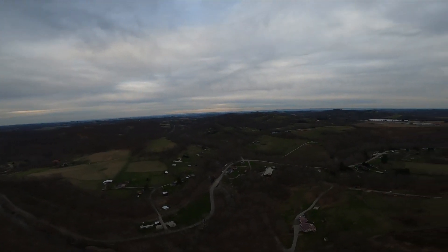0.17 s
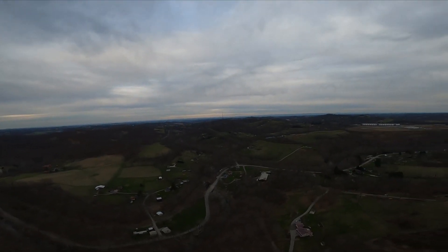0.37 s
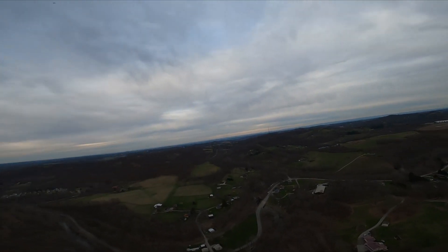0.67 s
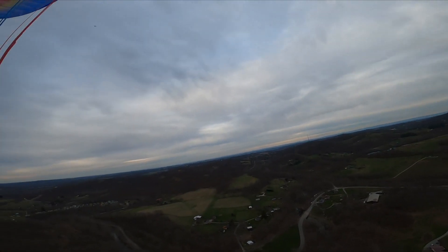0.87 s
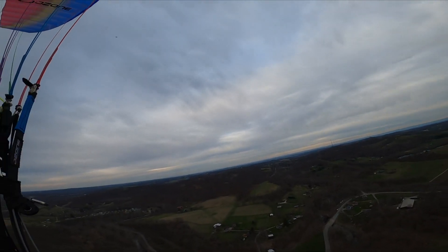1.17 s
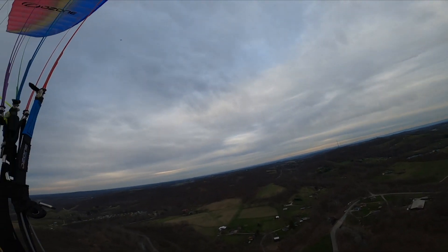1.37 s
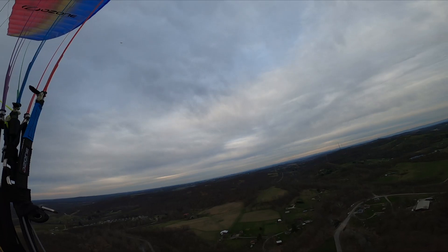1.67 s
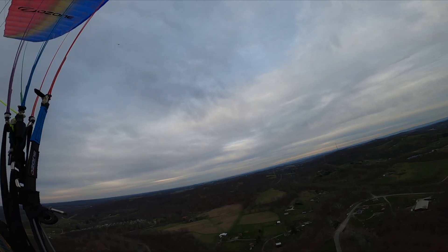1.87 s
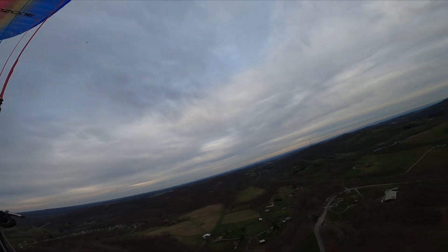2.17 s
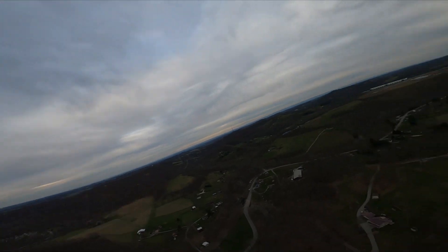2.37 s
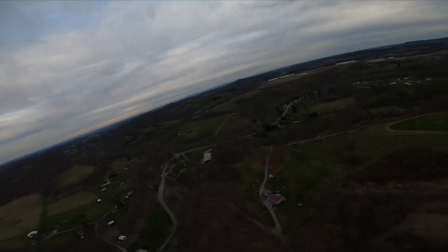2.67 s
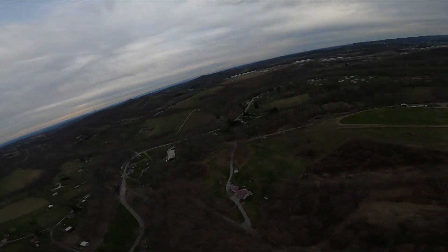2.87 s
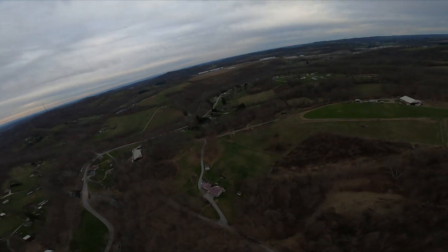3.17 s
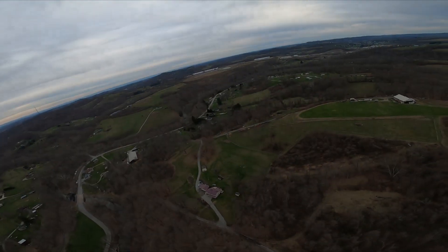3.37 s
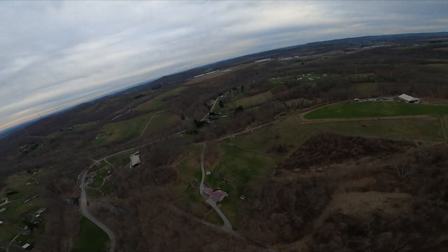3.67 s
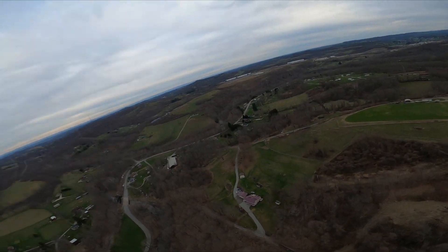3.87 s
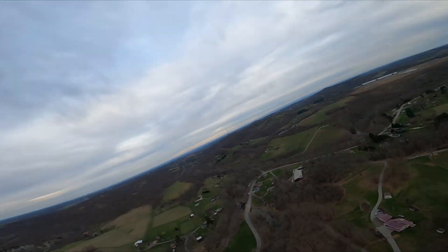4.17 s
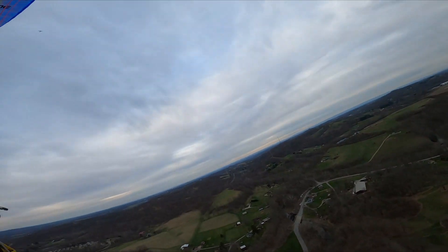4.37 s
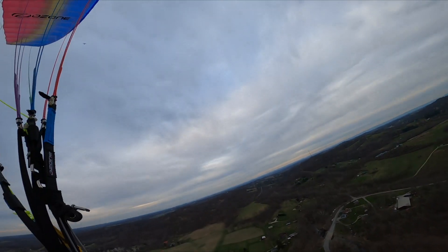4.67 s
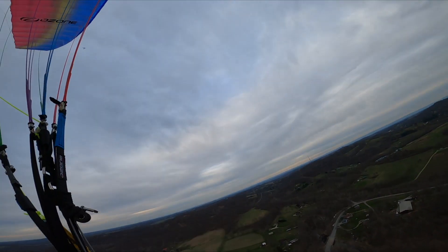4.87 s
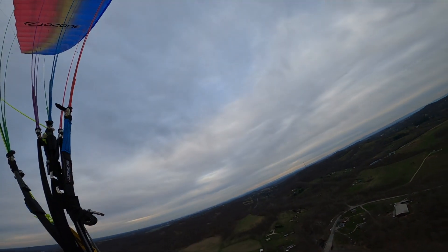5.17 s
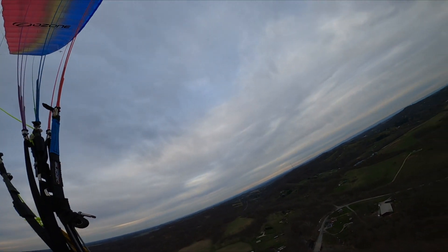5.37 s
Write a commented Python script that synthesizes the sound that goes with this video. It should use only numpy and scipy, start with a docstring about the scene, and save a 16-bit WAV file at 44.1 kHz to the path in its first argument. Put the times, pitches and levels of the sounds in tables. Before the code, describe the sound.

A steady paramotor flight with no start or stop: low buzzing engine, rapid propeller throb and broad rushing air, close and dense, without echo. The helmet microphone turns aside after about one second, opening the treble, faces ahead from about two and a half seconds, adding fan-like whine and stronger airstream hiss, then turns aside again after four seconds, when the drone softens slightly.

```python
"""A rough, beating drone runs throughout, together with air noise: a paramotor in steady flight, with the
microphone at the pilot's helmet. A two-stroke fires 94 times a second and turns a two-blade propeller through
a belt; the two rows of harmonics beat against each other over prop wash, which is noise chopped at the blade
rate. Twice the head turns aside, which uncovers the treble. While it faces ahead, the whine (sines locked to
the crank) and the airstream's hiss (filtered noise) are strongest."""
import sys
import numpy as np
from scipy import signal
from scipy.fft import rfft, irfft
from scipy.io import wavfile
from scipy.ndimage import uniform_filter1d

SR = 44100
rng = np.random.default_rng(int(sys.argv[2]) if len(sys.argv) > 2 else 0)


def put_to_file(sound):
    """Save the sound as 16-bit audio at rate SR, in the file named by the first command-line argument."""
    columns = np.atleast_2d(sound).T  # one column per channel
    safe = np.clip(columns, -1, 1)
    whole_steps = np.round(safe * 32767)
    wavfile.write(sys.argv[1], SR, whole_steps.astype(np.int16))


N = 243431
T = np.arange(N) / SR
HZ = np.maximum(np.arange(N // 2 + 1) * SR / N, 1)


def from_db(db):
    """Decibels to gain."""
    return 10 ** (np.asarray(db) / 20)


def rms_one(x):
    """Scale to rms 1."""
    return x / np.sqrt(np.mean(x ** 2) + 1e-20)


def in_time(rows):
    """Each column of a curve at every sample."""
    s, *columns = np.transpose(rows)
    return [np.interp(T, s, c) for c in columns]


def at_hz(rows):
    """Each dB column of a spectrum as a gain at every frequency."""
    hz, *columns = np.transpose(rows)
    return [from_db(np.interp(np.log(HZ), np.log(hz), c)) for c in columns]


def coloured(x, gain):
    """Filter by a gain per frequency."""
    return irfft(rfft(x) * gain, N)


def drift(rate_hz):
    """Slow chance with spread 1: noise through two equal low-pass poles, computed every 40 samples."""
    pole = np.exp(-80 * np.pi * rate_hz / SR)
    noise = rng.standard_normal(N // 40 + 2002)
    slow = signal.lfilter([1], [1, -2 * pole, pole * pole], noise)[2000:]  # drop the filter's start
    return np.interp(np.arange(N) / 40, np.arange(len(slow)), rms_one(slow))


def swells(rows):
    """Sum of smooth rises and dips in dB."""
    return sum(db * np.exp(-.5 * ((T - s) / width) ** 2) for s, width, db in rows)


def by_turn(turn):
    """Shares of the three head directions: ahead, half turned, aside."""
    return np.array([np.interp(turn, [0, .5, 1], corner) for corner in np.eye(3)])


HEAD_START = .48  # about half turned (0 ahead .. 1 aside)
# turns of the head that carries the microphone: (middle time [s], duration [s], new direction [0-1])
HEAD_TURNS = [(0.65, .55, 0.64), (0.965, 0.06, 1), (1.9, .8, .95), (2.385, 0.17, .4), (2.57, .2, .05),
              (4.27, .16, .4), (4.445, .15, .86), (4.7, .36, 1)]


def head_direction():
    """The head rests, and moves at an even pace to each new direction."""
    turn = np.full(N, HEAD_START)
    for middle, duration, direction in HEAD_TURNS:
        progress = np.clip((T - middle) / duration + .5, 0, 1)
        turn = turn + (direction - turn) * progress
    return turn


# gusts and lulls in the airflow: (time [s], width [s], level [dB])
GUSTS = [(0.0, 0.23, -2), (1.08, 0.12, 1.5), (2.45, 0.21, -3), (2.83, .15, -2), (3.75, 0.47, 2.5)]


def gusts():
    """Strength of the airflow in dB, 0 in calm air."""
    return swells(GUSTS)


# engine speed: (time [s], rate [firings per s])
ENGINE_SPEED = [(0, 94.42), (0.35, 94.54), (1.1, 93.8), (1.7, 93.61), (2.25, 94.19), (2.75, 93.82),
                (3.15, 94.21), (4.85, 93.74), (5.52, 93.88)]


def crank_turns():
    """Turns of the crank so far; a two-stroke fires once in each."""
    speed, = in_time(ENGINE_SPEED)
    return np.cumsum(speed) / SR


# bursts of turbulence within one blade passage:
# (place in the cycle [0-1], width [cycles], relative height ahead, half turned, aside)
BLADE_BURSTS = [(.86, .045, 1.5, .9, .6), (.52, .09, .3, 1.4, .6), (.62, .19, .3, .2, 1.0),
                (.1, .13, 1.1, .15, .1)]
EVENER_ASIDE = .7  # share of their unevenness that the bursts lose, heard directly with the head aside


def chopping(passages, turn, depth, uneven_db):
    """The air bursts as each blade cuts the wakes of pilot and frame, every burst with its own strength."""
    gain, shares = np.ones(N), by_turn(turn)
    uneven_db = uneven_db * (1 - EVENER_ASIDE * turn)
    for place, width, *heights in BLADE_BURSTS:
        count, within = np.divmod(passages - place + .5, 1)
        count = (count - count[0]).astype(int)
        chance = np.clip(rng.standard_normal(count[-1] + 1), -2, 2)
        strength = from_db(uneven_db * chance[count])
        shape = np.exp(-.5 * ((within - .5) / width) ** 2)
        gain += depth * (heights @ shares) * strength * shape
    quarter_second_power = uniform_filter1d(gain ** 2, size=SR // 4)
    return gain / np.sqrt(quarter_second_power)


# colour of the wash at the helmet, before trim and gusts:
# (frequency [Hz], density [dB per Hz] ahead, half turned, aside)
WASH_COLOUR = [(20, -60.5, -53, -50.5), (70, -50, -53, -44.5), (130, -49, -48.5, -46), (193, -47, -48, -45),
               (270, -44.5, -45.5, -45), (500, -52.5, -51.5, -50.5), (616, -55, -51, -51.5),
               (750, -55.5, -54.5, -53), (1404, -60, -58, -56.5), (2390, -73.5, -73.5, -65),
               (2950, -75, -73, -66.5), (3500, -79.5, -80, -71.5), (3950, -79.5, -76, -68),
               (4870, -90, -84, -79), (5880, -94.5, -85.5, -82), (7960, -99.6, -99.5, -90),
               (9600, -106, -103, -102), (12900, -109, -108, -106), (14500, -134, -134, -134)]
# eddies of every size are chopped in their own way: (band centre [Hz], chopping depth ahead, half turned,
# aside, burst unevenness facing ahead [dB], gain per dB of gust [dB])
EDDIES = [(249, .2, .2, .2, 1, 0), (920, 1.7, 1.2, .6, 3.2, 1.25), (2160, 1.1, 1.1, .65, 2.9, .9),
          (5600, .3, 1.5, .85, 3.4, .7), (12000, .8, 1.3, 1.1, 5.5, .8)]
WASH_TRIM_DB = -.5  # for every band above the deep rumble


def wash(passages, firings, turn, gust_db, grain_db=2.17, rasp=0.043):
    """Chopped air in overlapping bands, rasping slightly with the firings; facing ahead shades its treble."""
    centres, shares = np.array(EDDIES)[:, 0], by_turn(turn)
    air = np.zeros(N)
    for k, (corner, eddy) in enumerate(zip(np.eye(len(EDDIES)), EDDIES)):
        _, *depths, uneven_db, follows = eddy
        gain = chopping(passages, turn, depths @ shares, uneven_db) * from_db(follows * gust_db)
        if k > 0:  # the deep rumble stays smooth while the rush above it is grainy
            grain = rms_one(from_db(grain_db * drift(200)))
            gain = gain * grain * from_db(WASH_TRIM_DB) * (1 + rasp * np.cos(2 * np.pi * firings))
        band = np.sqrt(np.interp(np.log(HZ), np.log(centres), corner))
        noise = rng.standard_normal(N) * np.sqrt(SR / 2)  # power 1 per Hz
        air += coloured(gain * noise, band)
    air = coloured(air, HZ ** 2 / np.hypot(HZ ** 2, 22 ** 2))  # thin out below 22 Hz
    return sum(share * coloured(air, colour) for share, colour in zip(shares, at_hz(WASH_COLOUR)))


# colour of the hiss: (frequency [Hz], relative density [dB per Hz])
HISS_COLOUR = [(6000, -26.5), (8600, 0.5), (10200, -6), (11500, 1), (12500, -3), (13300, -14), (15000, -40)]
# hiss at the helmet: (time [s], level [dB])
HISS_LEVEL = [(0, -78), (.5, -75), (1.0, -63), (1.5, -74), (2.25, -67), (2.5, -78), (2.95, -68),
              (3.25, -64), (3.45, -62.5), (3.65, -59.5), (3.85, -59), (4.05, -60), (4.25, -61.5),
              (4.6, -71), (5.52, -71)]


def hiss(passages, turn):
    """Air over the helmet: a thin noise, chopped with the blades."""
    hiss_db, = in_time(HISS_LEVEL)
    colour, = at_hz(HISS_COLOUR)
    noise = rms_one(coloured(rng.standard_normal(N), colour))
    return from_db(hiss_db) * noise * chopping(passages, turn, depth=.8, uneven_db=6.5)


# colour of the sizzle: (frequency [Hz], relative density [dB per Hz])
SIZZLE_COLOUR = [(10000, -29), (12400, -1), (14500, 2), (15700, -6)]
# sizzle at the helmet, held near the peak of the strongest gust and flaring as it wanes:
# (time [s], level [dB], flutter [dB])
SIZZLE_LEVEL = [(2.9, -100, 0), (3.5, -72, 0), (3.72, -63.5, 2), (4.05, -63.5, 1), (4.18, -58, 8),
                (4.25, -57, 6), (4.31, -77, 5), (4.6, -99, 5)]
PUFF_PLACE, BLADES = .7, 2  # place of the puff in the blade cycle (0-1), blades of the propeller


def sizzle(passages, blade_mismatch=.3):
    """Higher air noise that starts smoother, then puffs with each blade, one blade harder than the other."""
    sizzle_db, flutter_db = in_time(SIZZLE_LEVEL)
    colour, = at_hz(SIZZLE_COLOUR)
    noise = rms_one(coloured(rng.standard_normal(N), colour))
    angle = 2 * np.pi * (passages - PUFF_PLACE)
    mismatch = 1 - blade_mismatch * np.cos(angle / BLADES)
    puffs = rms_one(from_db(flutter_db * np.cos(angle)) * mismatch)
    return from_db(sizzle_db) * noise * puffs


# partials of the whine: (multiple of the crank rate)
WHINE_MULTIPLES = [15, 29, 30, 31]
# their strength in the same order: (relative level [dB])
WHINE_PARTIALS_DB = [1, -12, 0, -13]
# whine at the helmet: (time [s], level [dB])
WHINE_LEVEL = [(0, -57), (.4, -49), (.6, -52), (.85, -57), (2.9, -59), (3.1, -50.5), (3.45, -46),
               (4.08, -45.5), (4.2, -53), (4.4, -56), (5.52, -58)]
WHINE_JITTER = .003  # crank cycles, rms


def whine(firings):
    """A thin whine locked to the crank, as from the vanes of a cooling fan; it is slightly unsteady."""
    whine_db, = in_time(WHINE_LEVEL)
    angle = 2 * np.pi * (firings + WHINE_JITTER * drift(22))
    partials = sum(from_db(level_db + drift(24)) * np.sin(multiple * angle)
                   for multiple, level_db in zip(WHINE_MULTIPLES, WHINE_PARTIALS_DB))
    return np.sqrt(2) * from_db(whine_db) * partials


def pulse_phases(orders_db, size=1024):
    """Phases for a pressure pulse, steep at the front and ringing after (minimum phase)."""
    multiples = np.arange(1, len(orders_db) + 1)
    log_gain = np.log(from_db(np.interp(np.arange(size // 2 + 1), multiples, orders_db)))
    cepstrum = irfft(log_gain)
    one_sided = np.r_[cepstrum[0], 2 * cepstrum[1:size // 2]]
    return rfft(one_sided, size).imag[multiples]


WAVER_DB = .9  # wavering of each harmonic, rms
STEADY_BELOW_MULTIPLE = 4  # the long waves of the deepest harmonics waver less


def rotor(cycles, orders, turn, jitter, smear, rough_db, harmonic_swells=(), deep_lag=0):
    """Uneven pulses smeared on their way; head direction colours them and each harmonic wavers."""
    levels_db, shares = np.array(orders)[:, 1:], by_turn(turn)
    phases = pulse_phases(levels_db.mean(axis=1))
    angle = 2 * np.pi * (cycles + jitter * drift(25))
    out = np.zeros(N)
    for k, (level_db, phase) in enumerate(zip(levels_db, phases), 1):
        waver_db = min(k / STEADY_BELOW_MULTIPLE, 1) * WAVER_DB * drift(1.2)
        swell_db = waver_db + swells(row[:-1] for row in harmonic_swells if row[-1] == k)
        shift = smear * k ** 2 - deep_lag * min(1, (2 / k) ** 2)  # cycles
        gain = from_db(level_db @ shares + swell_db)
        out += gain * np.cos(k * angle + phase + 2 * np.pi * shift)
    return np.sqrt(2) * out * from_db(rough_db * drift(43))


# harmonics of the firing rate, before trim and gusts: (multiple, level [dB] ahead, half turned, aside)
EXHAUST_ORDERS = [(1, -21.4, -22.0, -22.9), (2, -30.5, -35.4, -35.0), (3, -24.8, -26.7, -30.3),
                  (4, -32.4, -31.6, -31.9), (5, -35.4, -34.2, -36.1), (6, -37.6, -38.4, -40.5),
                  (7, -39.2, -42.2, -44.7), (8, -45.5, -47.5, -45.6), (9, -42.5, -44.6, -43.9),
                  (10, -48.0, -48.7, -49.7)]
# single exhaust harmonics swell or fade for a while: (time [s], width [s], level [dB], multiple)
EXHAUST_SWELLS = [(.75, .25, 1.5, 1), (1.4, .15, -3, 1), (5.25, .2, 2.5, 1), (3.7, .4, 1.5, 2),
                  (.2, .3, -2, 3), (1.6, .3, -3, 3), (2.6, .2, 3, 3), (4.0, .35, 1.5, 3)]
EXHAUST_TRIM_DB, EXHAUST_FOLLOWS = 0.96, 0.57  # dB in calm air, dB gained per dB of gust
EXHAUST_JITTER, EXHAUST_SMEAR = .003, .04  # cycles rms, cycles per squared multiple (dispersion)


def exhaust(firings, turn, gust_db):
    """The two-stroke's pulse at every firing."""
    pulses = rotor(firings, EXHAUST_ORDERS, turn, EXHAUST_JITTER, EXHAUST_SMEAR,
                   rough_db=0.97, harmonic_swells=EXHAUST_SWELLS)
    return from_db(EXHAUST_TRIM_DB + EXHAUST_FOLLOWS * gust_db) * pulses


# harmonics of the blade-passing rate, before trim and gusts:
# (multiple, level [dB] ahead, half turned, aside)
BLADE_ORDERS = [(1, -24.0, -22.1, -20.5), (2, -27.4, -30.7, -31.5), (3, -31.0, -31.7, -33.0),
                (4, -28.0, -33.0, -34.5), (5, -25.8, -27.4, -27.7), (6, -26.7, -28.1, -27.8),
                (7, -28.8, -30.2, -32.5), (8, -34.9, -37.9, -38.5), (9, -33.5, -37.3, -38.9),
                (10, -43.0, -32.0, -30.5), (11, -31.5, -37.0, -37.0), (12, -48.4, -38.9, -38.9),
                (13, -41.6, -41.6, -41.5), (14, -46.5, -45.4, -41.6), (15, -47.0, -48.5, -47.9),
                (16, -41.3, -44.8, -47.0), (17, -43.8, -44.9, -48.2), (18, -52.9, -44.7, -46.2),
                (19, -46.8, -47.4, -49.4), (20, -47.0, -50.1, -50.3), (21, -56.0, -45.1, -48.3),
                (22, -52.5, -54.4, -48.9)]
# single blade harmonics swell or fade for a while: (time [s], width [s], level [dB], multiple)
BLADE_SWELLS = [(.15, .08, -9, 2), (2.85, .25, -4, 2), (3.6, .2, 6, 2), (5.0, .3, -7, 2), (1.5, .4, -7, 3),
                (2.55, .25, 4, 3), (3.45, .25, -9, 3), (4.3, .18, 8, 3), (2.3, .15, -5, 4), (3.7, .4, 2, 4),
                (4.9, .3, -5, 4), (2.35, .2, 4.5, 5), (3.9, .35, 2, 5), (.5, .15, -6, 6),
                (1.15, .25, 2.5, 6), (2.5, .2, 3, 6), (.15, .25, 5, 7), (.85, .15, -8, 7), (2.3, .3, 3, 7),
                (4.8, .15, -9, 7), (.2, .25, 5.5, 10), (2.0, .25, 4, 10), (2.44, .1, 6.5, 10),
                (2.7, .3, 3, 11), (3.5, .35, 2.5, 11), (5.1, .4, -6, 11)]
PROPELLER_TRIM_DB, PROPELLER_FOLLOWS = 1, 0.44  # dB in calm air, dB gained per dB of gust
BLADE_JITTER, BLADE_SMEAR = .001, .008  # cycles rms, cycles per squared multiple (dispersion)
SHADOW_LAG, SHADOW_GLIDE_S = .27, .7  # lag facing ahead (cycles), span over which it is averaged (s)


def propeller(passages, turn, gust_db):
    """A pulse per blade; facing ahead, the deepest harmonics bend round the pilot and trail."""
    facing_ahead = uniform_filter1d(1 - turn, size=int(SHADOW_GLIDE_S * SR), mode="nearest")
    pulses = rotor(passages, BLADE_ORDERS, turn, BLADE_JITTER, BLADE_SMEAR, rough_db=0.7,
                   harmonic_swells=BLADE_SWELLS, deep_lag=SHADOW_LAG * facing_ahead)
    return from_db(PROPELLER_TRIM_DB + PROPELLER_FOLLOWS * gust_db) * pulses


# the drone above its deepest throb sinks a little twice: (time [s], width [s], level [dB])
DRONE_DIPS = [(1.7, 0.42, -2.5), (5.25, 0.45, -4)]


def drone(firings, passages, turn, gust_db):
    """Exhaust and propeller tones beat together; the dips spare the deepest throb."""
    tones = exhaust(firings, turn, gust_db) + propeller(passages, turn, gust_db)
    throb = coloured(tones, 1 / (1 + (HZ / 70) ** 8))  # below about 70 Hz
    return throb + from_db(swells(DRONE_DIPS)) * (tones - throb)


BELT_RATIO = 3.7934  # crank turns per propeller turn
EXHAUST_LAG, BLADE_LAG = .44, .66  # share of its own cycle by which each pulse trails the crank


def scene():
    """The belt locks crank and propeller; gusts and head direction act on the wash and the drone."""
    turn, gust_db = head_direction(), gusts()
    crank = crank_turns()
    firings = crank - EXHAUST_LAG
    passages = crank * BLADES / BELT_RATIO - BLADE_LAG
    air = wash(passages, firings, turn, gust_db) + hiss(passages, turn) + sizzle(passages)
    return (air + whine(firings) + drone(firings, passages, turn, gust_db))[None]


CUTOFF_HZ = 15700


def record(dry, top=0.86):
    """The microphone end: peaks are gently rounded; the very bottom and the top are cut."""
    rounded = coloured(top * np.tanh(dry / top), HZ > 10)
    low_pass = signal.cheby1(10, .2, CUTOFF_HZ, fs=SR, output="sos")
    return signal.sosfilt(low_pass, rounded)


dry = scene()
out = record(dry)
put_to_file(out)
```